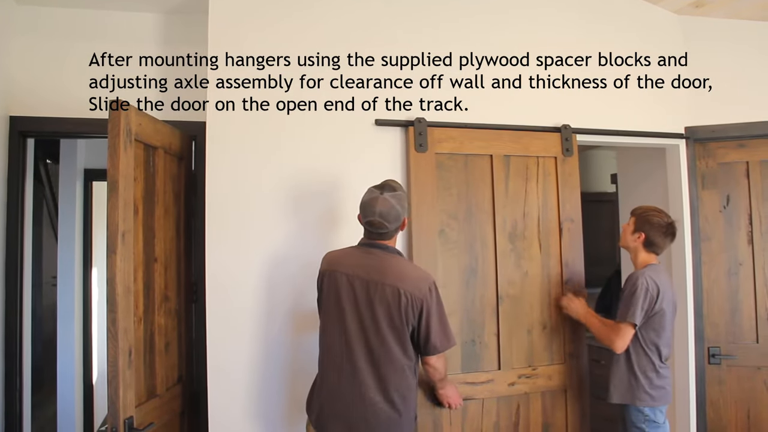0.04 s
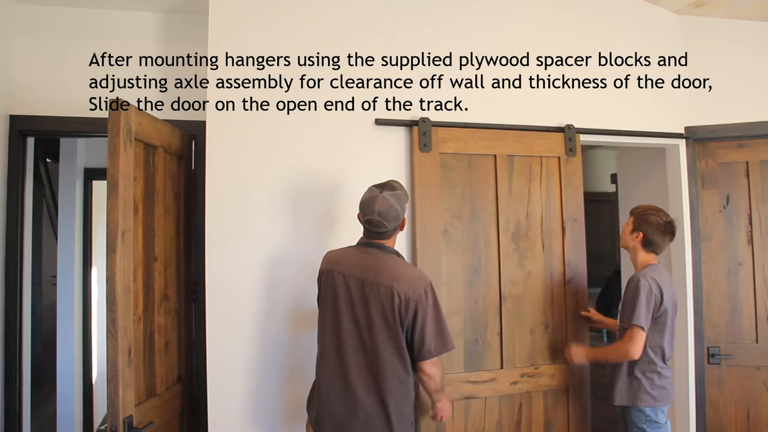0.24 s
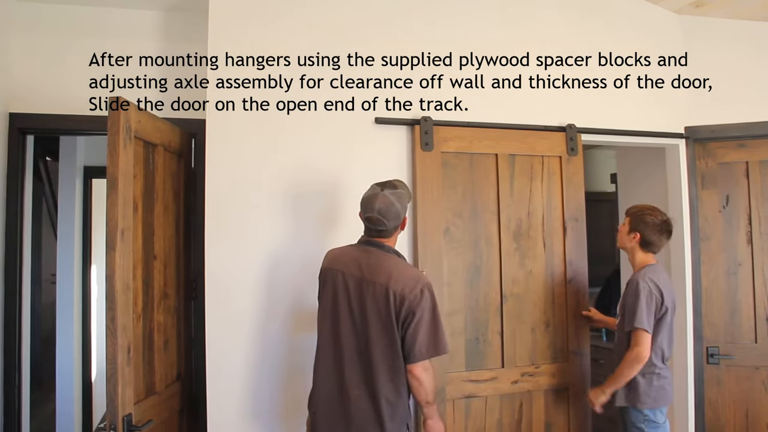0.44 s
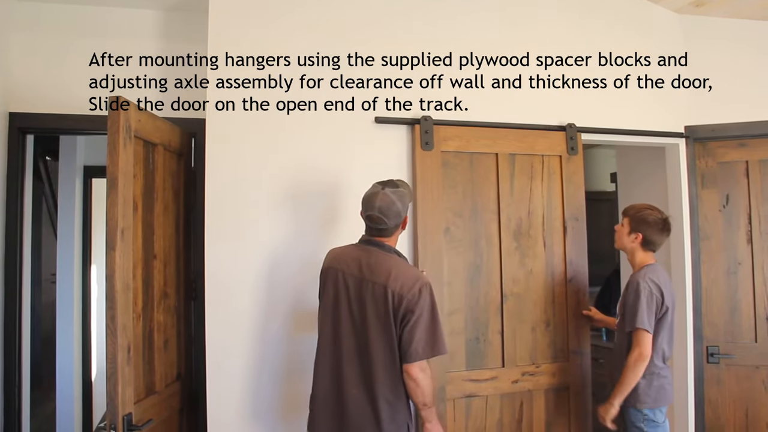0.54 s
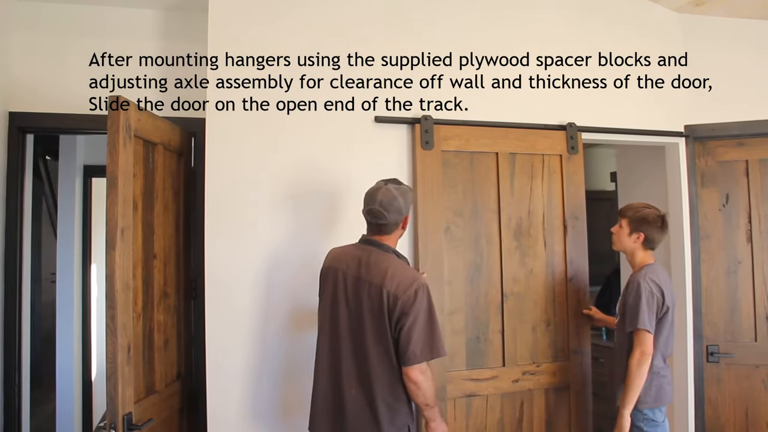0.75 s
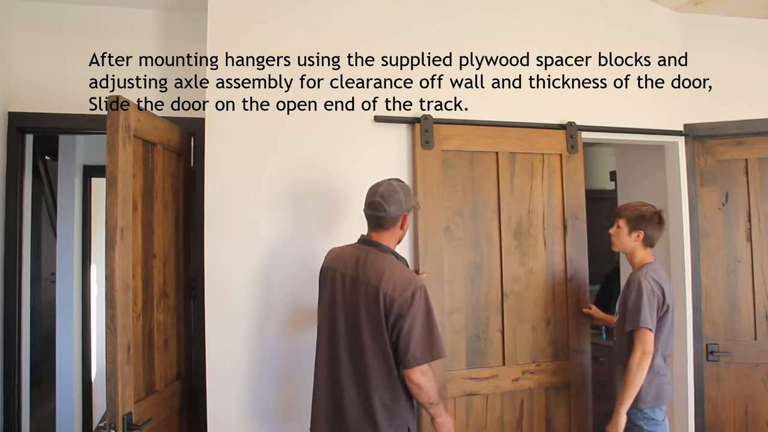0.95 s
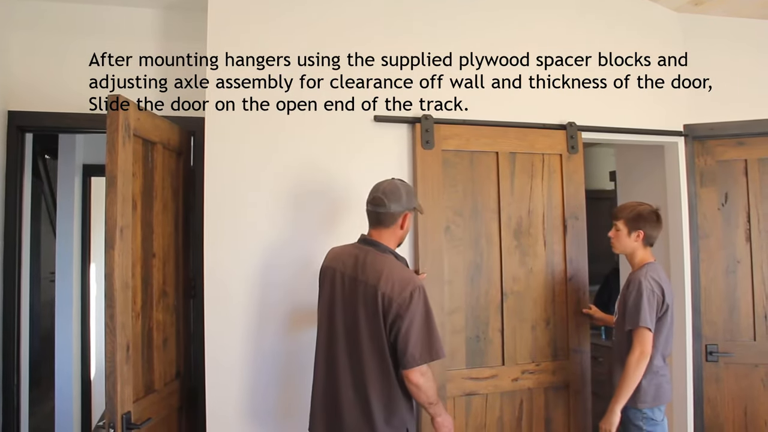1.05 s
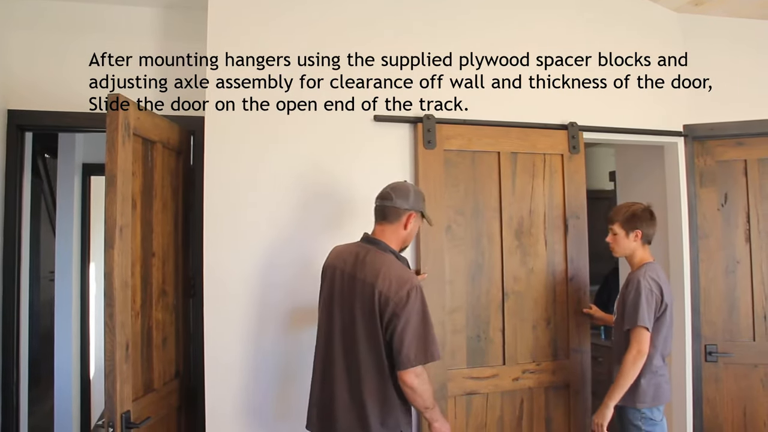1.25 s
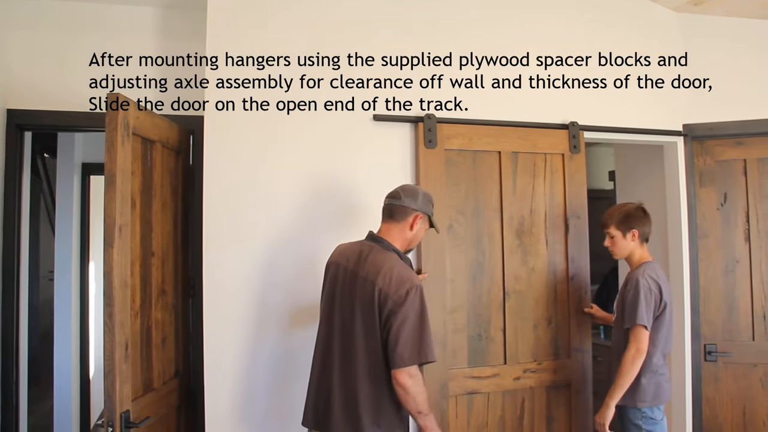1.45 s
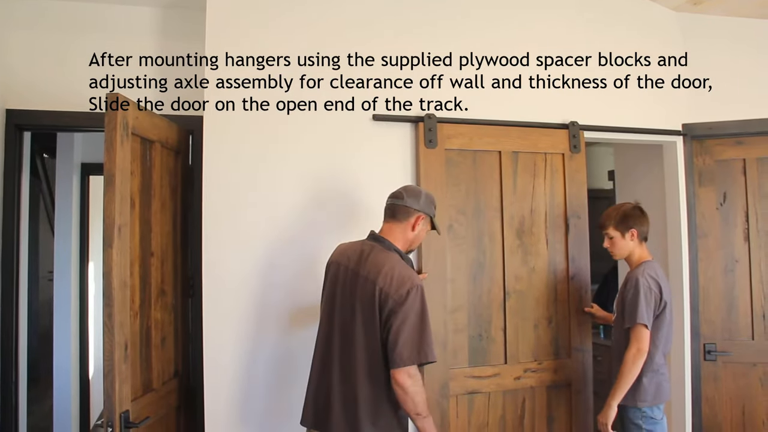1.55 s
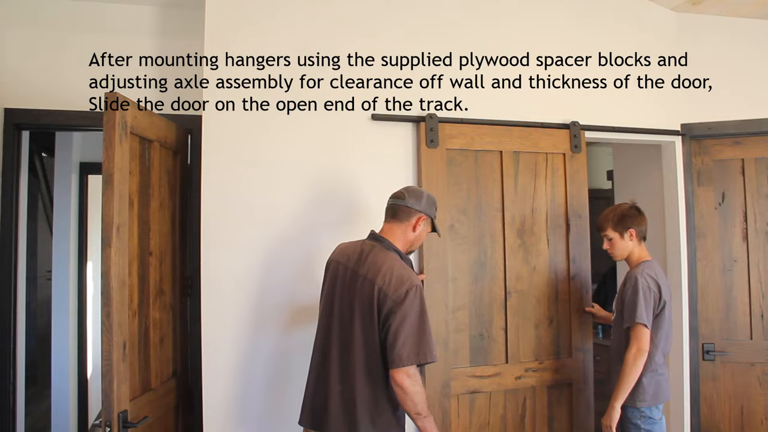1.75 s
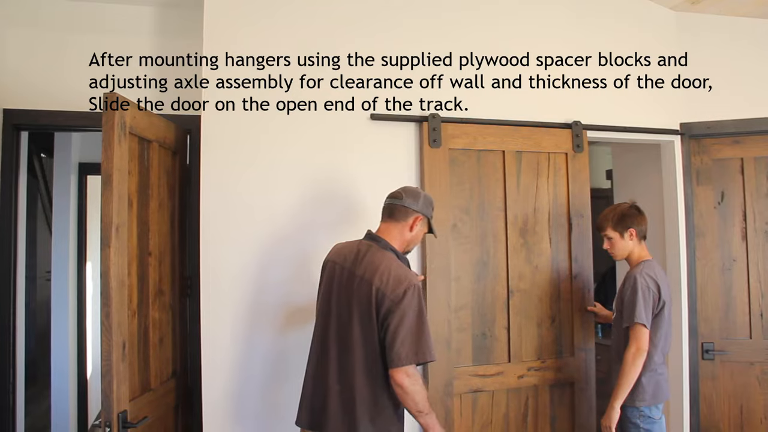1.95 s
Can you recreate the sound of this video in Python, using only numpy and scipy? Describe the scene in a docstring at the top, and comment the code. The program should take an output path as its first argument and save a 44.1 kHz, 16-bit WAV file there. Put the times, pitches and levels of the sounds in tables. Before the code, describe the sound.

Two short, low rolling rumbles from a wooden barn door on its rail, over room noise.

```python
"""A soft shuffle and rustle over steady room noise, then a heavy wooden barn door rolls a short way
along its steel track, twice, in a bare room. The wheels rumble through the door's resonances, hiss
on the rail and crackle over grit. The door thuds in its hangers; its big panel booms near 100 Hz
and rings on after each push."""
import sys
import numpy as np
from scipy import signal
from scipy.fft import rfft, irfft, next_fast_len
from scipy.io import wavfile
from scipy.ndimage import map_coordinates

SR = 44100
rng = np.random.default_rng(int(sys.argv[2]) if len(sys.argv) > 2 else 0)


def generate_wav(sig):
    """Save sig (samples, or channels by samples) to the path in sys.argv[1] as 16-bit PCM at SR."""
    pcm = np.round(np.clip(np.atleast_2d(sig).T, -1, 1) * 32767).astype(np.int16)
    wavfile.write(sys.argv[1], SR, pcm)


N = 88200


def amp(db):
    """Decibels to gain."""
    return 10 ** (np.asarray(db) / 20)


def unit(x):
    """Scale to rms 1."""
    return x / np.sqrt(np.mean(np.abs(x) ** 2) + 1e-20)


def clock():
    """Sample times in seconds."""
    return np.arange(N) / SR


def wobble(knots_per_s):
    """Smooth random curve."""
    return map_coordinates(rng.standard_normal(4096), [clock() * knots_per_s + 2], mode="wrap")


def envelope(points):
    """Gain through (time_s, level_db) points, silent outside them."""
    return amp(np.interp(clock(), *np.transpose(points), left=-120, right=-120))


def swell(peak_s, width_s, level_db):
    """Gaussian gain bump."""
    return amp(level_db) * np.exp(-((clock() - peak_s) / width_s) ** 2)


def filtered(x, response):
    """Apply a gain given as a function of Hz."""
    size = next_fast_len(N + 8192)
    return irfft(rfft(x, size) * response(np.fft.rfftfreq(size, 1 / SR)), size)[:N]


def noise(spectrum):
    """Noise of rms 1 coloured by (freq_hz, gain_db) points."""
    freq_hz, gain_db = np.transpose(spectrum)
    white = rng.standard_normal(N)
    return unit(filtered(white, lambda hz: amp(np.interp(np.log(hz + 1), np.log(freq_hz + 1), gain_db))))


def swishes(swells, spectrum):
    """Short swells of coloured noise."""
    return noise(spectrum) * sum(swell(*row) for row in swells)


def tone(pitch_hz, wander_hz):
    """Sine of rms 1 with wandering pitch."""
    cycles = np.cumsum(pitch_hz + wander_hz * wobble(25.37)) / SR
    return np.sqrt(2) * np.sin(2 * np.pi * (cycles + rng.random()))


def ringing(modes, evenness):
    """Resonances kept ringing by random jolts; evenness 0-1 steadies each one's strength."""
    total = np.zeros(N)
    for centre_hz, width_hz, gain_db in modes:
        jolts = rng.standard_normal(N)
        band = filtered(jolts, lambda hz: 1 / (1 + (2 * (hz - centre_hz) / width_hz) ** 2))
        analytic = unit(signal.hilbert(band))
        total += amp(gain_db) * unit(analytic.real / (np.abs(analytic) + 0.12) ** evenness)
    return unit(total)


def in_room(x, t60_s=0.42, echo_db=-0.5):
    """Direct sound plus the bare room's diffuse echo."""
    tail = rng.standard_normal(N) * amp(-60 * clock() / t60_s)
    return x + amp(echo_db) * signal.fftconvolve(x, tail / np.linalg.norm(tail))[:N]


def room_noise(floor_db=-36, drift_db=0.5, modes_db=-39):
    """Low, slightly drifting background with droning room modes."""
    # freq_hz, gain_db
    floor_spectrum = [(20, -27), (42, -6), (74, -5), (100, -7), (170, -5), (200, -4), (300, -7),
                      (450, -9.5), (800, -14), (1300, -17), (2000, -23.5), (3200, -28.5), (5000, -34.5),
                      (9000, -41), (12000, -47), (15500, -51)]
    # centre_hz, width_hz, gain_db
    room_modes = [(111.2, 13.4, 1.5), (205.7, 35, 1.5), (240.4, 18, -12.5), (366, 35, -10.5),
                  (787, 91, -6.5)]
    floor = amp(floor_db + drift_db * wobble(9)) * noise(floor_spectrum)
    return floor + amp(modes_db) * ringing(room_modes, evenness=0.9)


def small_sounds():
    """Faint bright rustles, one tick and duller shuffles."""
    # peak_s, width_s, level_db
    rustles = [(.015, 0.047, -55.5), (.69, 0.055, -55), (1.955, 0.04, -51.5)]
    ticks = [(1.742, .002, -50)]
    shuffles = [(.015, 0.038, -36.5), (.14, 0.077, -41.5), (.84, 0.013, -52)]
    # freq_hz, gain_db
    bright_spectrum = [(400, -2), (1100, 2), (2500, -0.5), (5000, -1), (7000, -0.5), (10000, -5),
                       (15800, -21)]
    shuffle_spectrum = [(100, -13), (200, -14), (400, -0.5), (750, 3.5), (1150, -1), (2200, -9),
                        (5000, -20), (15800, -41)]
    bright = swishes(rustles, bright_spectrum) + swishes(ticks, bright_spectrum)
    return bright + swishes(shuffles, shuffle_spectrum)


def grit(spread_db=8, crackles_per_s=400):
    """Fine grit crackles under the wheels where they run fastest."""
    # peak_s, width_s, level_db
    patches = [(.295, .015, -57), (.36, .03, -54), (1.335, .04, -58)]
    # freq_hz, gain_db
    grit_spectrum = [(5000, -30), (9000, -8), (12500, 0), (14000, -3), (15800, -14)]
    return swishes(patches, grit_spectrum) * unit(amp(spread_db * wobble(crackles_per_s)))


def wheel_scuff():
    """A wheel scuffs the rail on the second push."""
    # peak_s, width_s, level_db
    scuffs = [(1.393, 0.0066, -33.5), (1.40, 0.044, -41)]
    # freq_hz, gain_db
    scuff_spectrum = [(400, -16), (1400, 5), (3200, -2), (5000, -10), (10000, -20), (15800, -37)]
    return swishes(scuffs, scuff_spectrum)


def rail_hiss():
    """Fine friction noise of the turning wheels, blended by the room."""
    # per push: time_s, level_db
    levels_1 = [(.195, -64), (.235, -43.5), (.30, -46.5), (.365, -43.5), (.42, -48.5), (.50, -51.5),
                (.60, -59)]
    levels_2 = [(1.18, -64), (1.25, -49.5), (1.305, -42), (1.36, -44), (1.42, -49.5), (1.49, -54),
                (1.60, -61)]
    # per push: freq_hz, gain_db
    spectrum_1 = [(500, -30), (2000, 2), (3300, 4), (4800, -2), (7000, -3.5), (10000, -8.5), (13000, -15),
                  (15800, -24)]
    spectrum_2 = [(500, -30), (2000, -18), (3600, 8), (5000, -4), (6200, 4), (7300, 1.5), (8400, -6),
                  (9700, -4.5), (12000, -15), (15800, -20)]
    pushes = [(levels_1, spectrum_1), (levels_2, spectrum_2)]
    return sum(envelope(levels) * unit(in_room(noise(spectrum))) for levels, spectrum in pushes)


def hanger_thuds():
    """The door thuds dully in its hangers."""
    # peak_s, width_s, level_db
    thuds = [(.33, 0.025, -30), (1.318, 0.03, -24), (1.39, 0.036, -34)]
    # freq_hz, gain_db
    thud_spectrum = [(20, -14), (35, -7), (50, 3), (70, -18), (115, 0), (165, -1), (220, -29), (500, -67)]
    return swishes(thuds, thud_spectrum)


def door_tones():
    """Single door resonances sing briefly where the wheels press hardest."""
    # peak_s, width_s, pitch_hz, level_db
    resonances = [(0.349, 0.05, 412, -21), (0.378, 0.031, 204, -23.5), (1.299, 0.03, 411.9, -21),
                  (1.392, 0.048, 436.2, -21), (1.395, 0.021, 227, -21)]
    return sum(swell(peak_s, width_s, level_db) * tone(pitch_hz, wander_hz=4.16)
               for peak_s, width_s, pitch_hz, level_db in resonances)


def panel_boom():
    """The panel's lowest mode builds with each shove and dies away."""
    # peak_s, rise_s, decay_db_per_s, level_db
    booms = [(.03, 0.035, 202, -36.5), (0.329, 0.049, 178, -20), (0.436, 0.042, 91.5, -15.5),
             (1.46, 0.075, 98, -26)]
    gain = np.zeros(N)
    for peak_s, rise_s, decay_db_per_s, level_db in booms:
        age_s = clock() - peak_s
        attack = np.exp(-(np.minimum(age_s, 0) / rise_s) ** 2)
        gain += attack * amp(level_db - decay_db_per_s * np.maximum(age_s, 0))
    return gain * tone(pitch_hz=99.9, wander_hz=0.98)


def rolling(ring_db=-3, rumble_db=-7, bump_db=1.25, bumps_per_s=110):
    """The wheels run over the uneven rail and shake the door."""
    # per push: time_s, level_db
    effort_1 = [(.19, -51), (.24, -24), (.29, -23.5), (.345, -16.5), (.385, -17), (.44, -19.5), (.50, -30),
                (.58, -32.5), (.70, -75)]
    effort_2 = [(1.12, -52), (1.21, -30.5), (1.26, -23.5), (1.30, -19.5), (1.345, -17.5), (1.395, -17),
                (1.45, -21.5), (1.50, -27), (1.60, -40.5)]
    # door resonances where it stands at each push: centre_hz, width_hz, gain_db
    modes_1 = [(51.7, 27, -17), (127.3, 22, -0.5), (205.4, 14.5, -0.5), (229.3, 11, -4.5), (301, 16, -2),
               (374, 19, -3.5), (405, 16, -3.5), (437.6, 18, -0.5), (507, 12, -6.5), (573, 20, -3.5),
               (647, 20, -7.5), (790, 38, -17), (881, 22, -12), (1071, 16, -8.5)]
    modes_2 = [(47.6, 20, -9.5), (114, 26, -6.5), (162, 20, -5), (224.5, 21, -0.5), (264, 24, -5),
               (297, 29, -10), (363.7, 15, -1), (405, 9.1, 0), (444, 16, -6), (505, 18, -7.5),
               (548.5, 25, -4.5), (625, 21, -9.5), (792, 31, -5), (1100, 20, -15)]
    # freq_hz, gain_db
    rumble_spectrum = [(20, -17), (60, -3.5), (200, -1), (450, 3), (800, 2), (1150, -2), (1500, -8),
                       (2300, -16), (3200, -18), (4600, -27), (8000, -32.5), (16000, -53)]
    total = np.zeros(N)
    for effort, modes in [(effort_1, modes_1), (effort_2, modes_2)]:
        rumble = unit(in_room(noise(rumble_spectrum)) * amp(bump_db * wobble(bumps_per_s)))
        ring = ringing(modes, evenness=0.65)
        total += envelope(effort) * (amp(ring_db) * ring + amp(rumble_db) * rumble)
    return total


def scene():
    """Two pushes of the door over room noise, mono."""
    wheels = rolling() + rail_hiss() + grit() + wheel_scuff()
    door = panel_boom() + door_tones() + hanger_thuds()
    return (wheels + door + small_sounds() + room_noise())[None]


def record(dry):
    """Brick-wall low-pass."""
    cutoff_hz = 15750
    return filtered(dry[0], lambda hz: hz < cutoff_hz)[None]


dry = scene()
out = record(dry)
generate_wav(out)
```